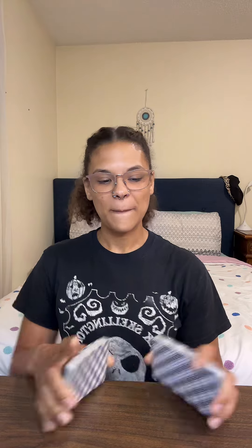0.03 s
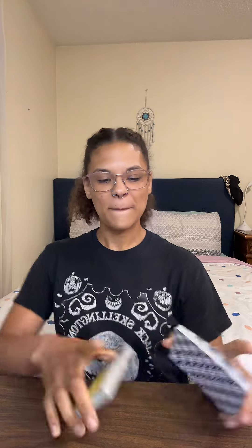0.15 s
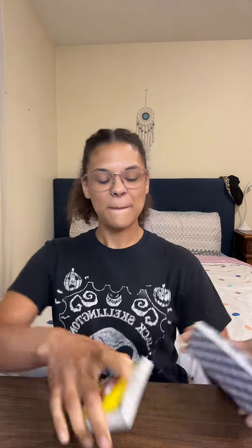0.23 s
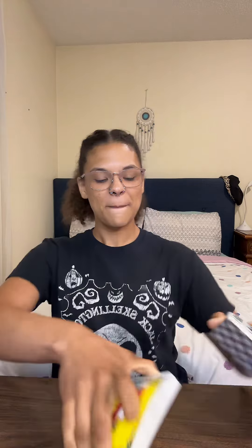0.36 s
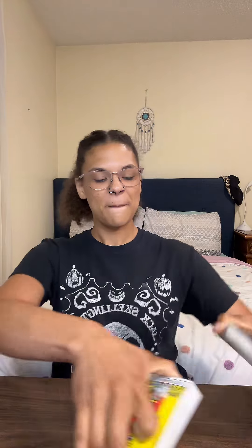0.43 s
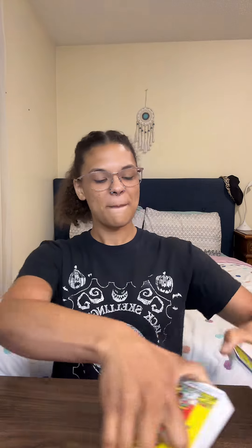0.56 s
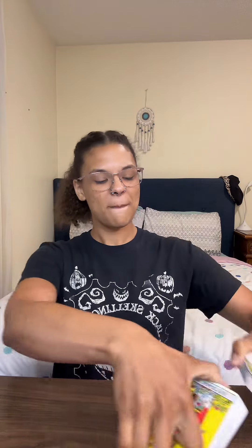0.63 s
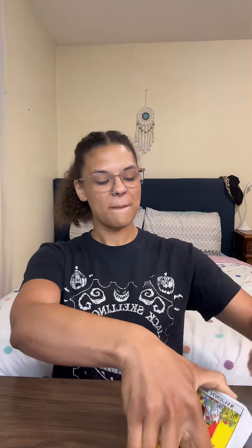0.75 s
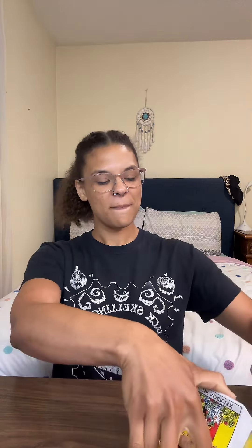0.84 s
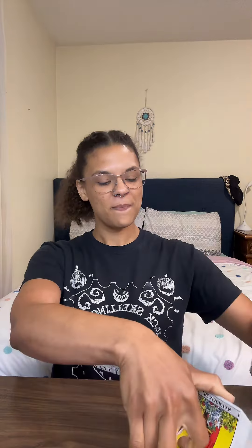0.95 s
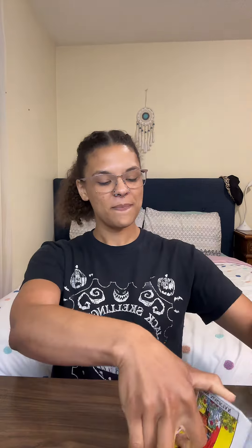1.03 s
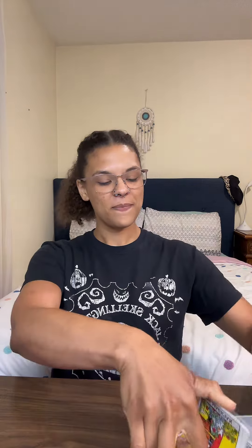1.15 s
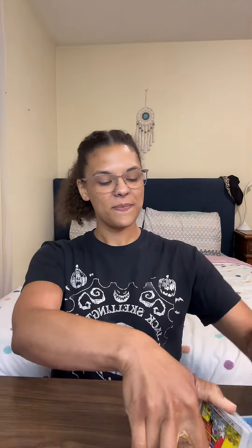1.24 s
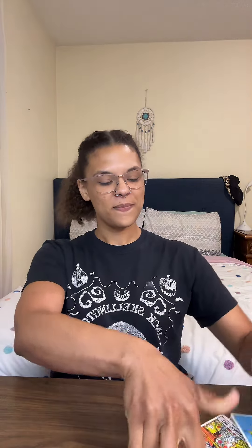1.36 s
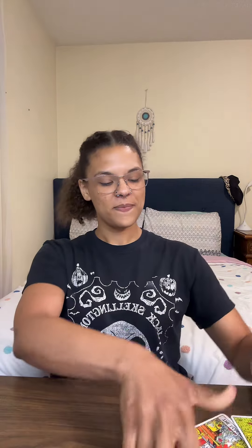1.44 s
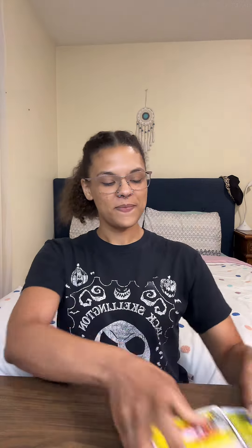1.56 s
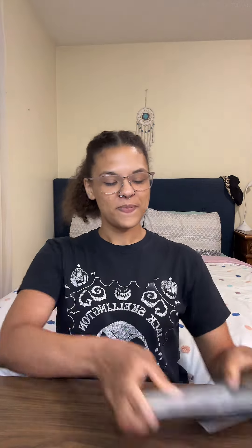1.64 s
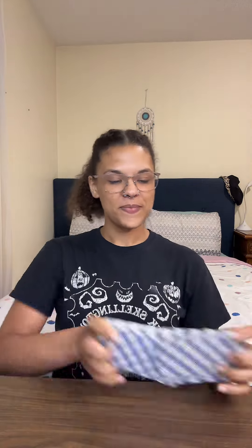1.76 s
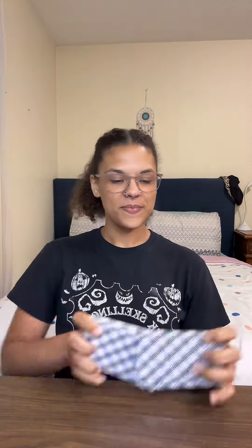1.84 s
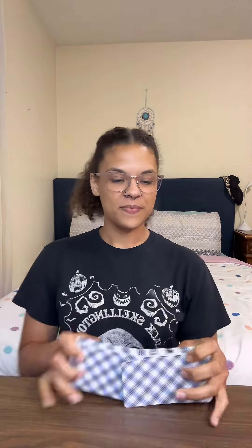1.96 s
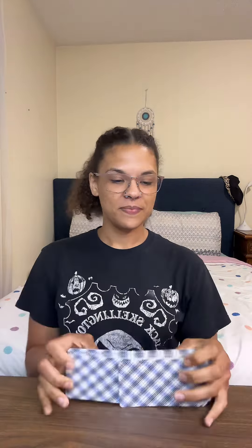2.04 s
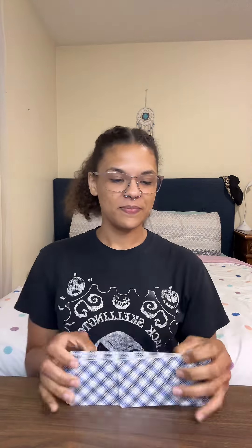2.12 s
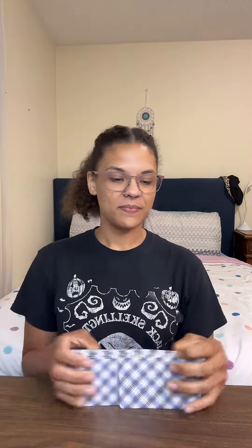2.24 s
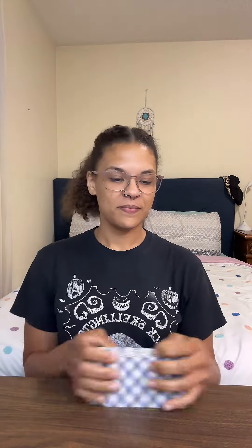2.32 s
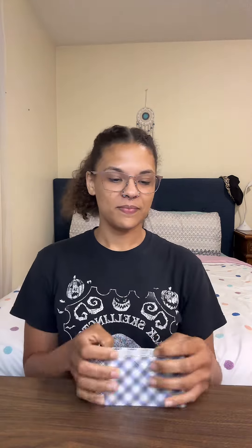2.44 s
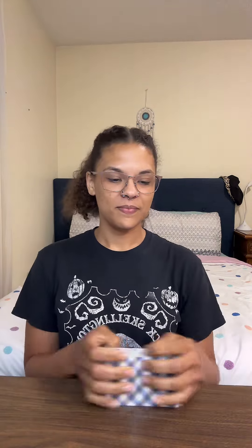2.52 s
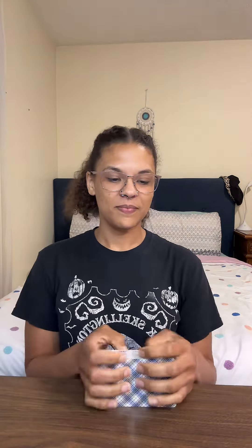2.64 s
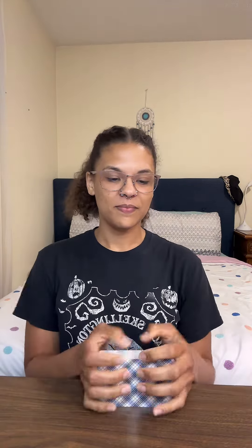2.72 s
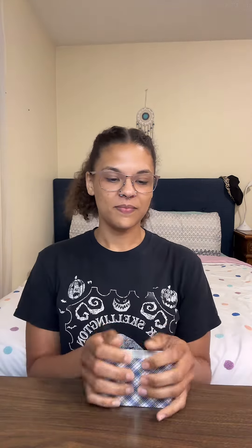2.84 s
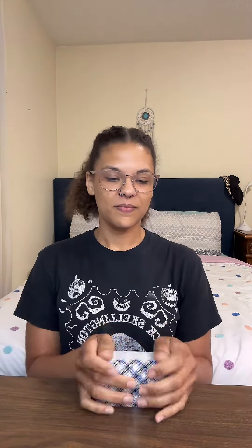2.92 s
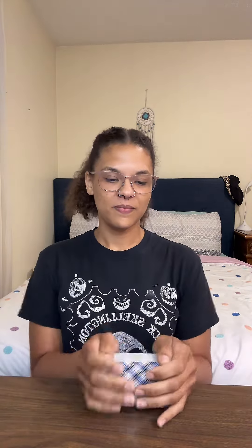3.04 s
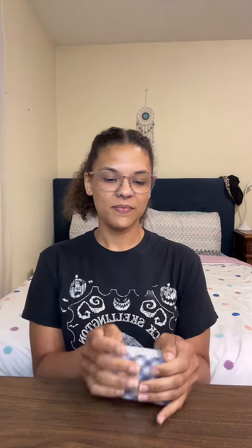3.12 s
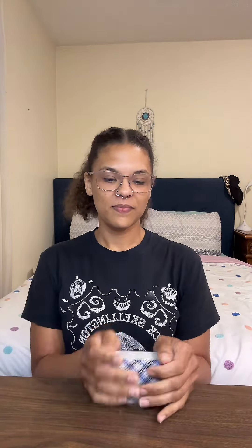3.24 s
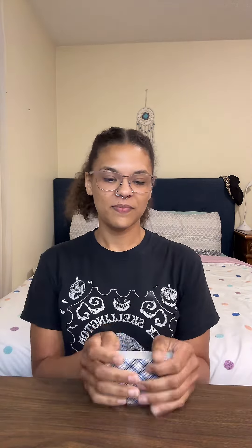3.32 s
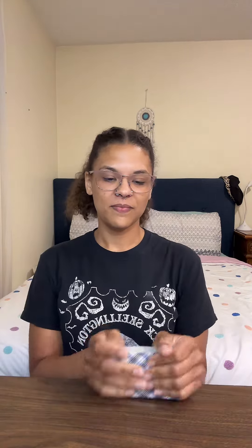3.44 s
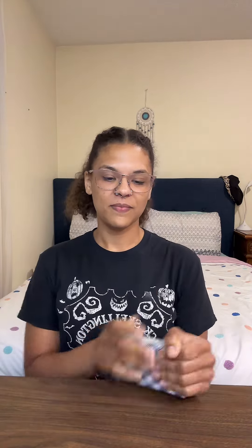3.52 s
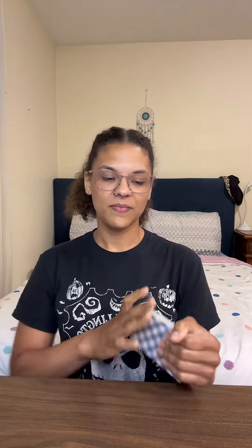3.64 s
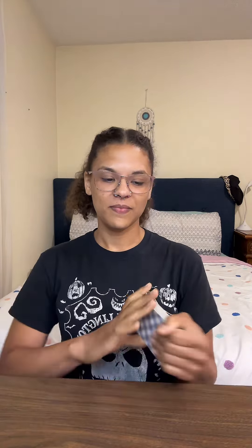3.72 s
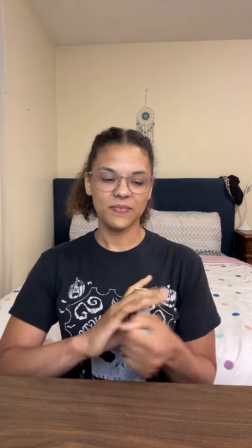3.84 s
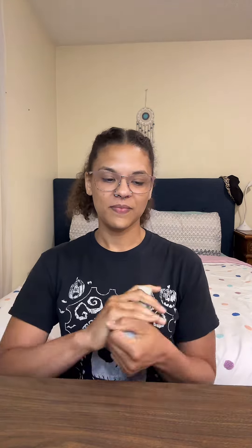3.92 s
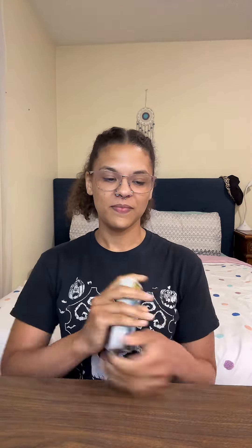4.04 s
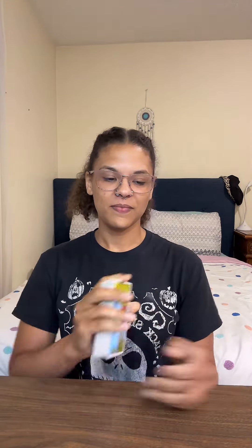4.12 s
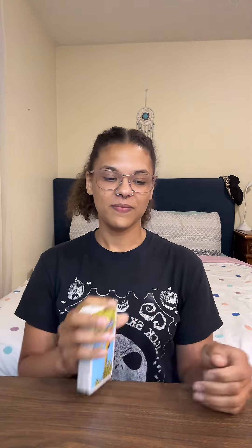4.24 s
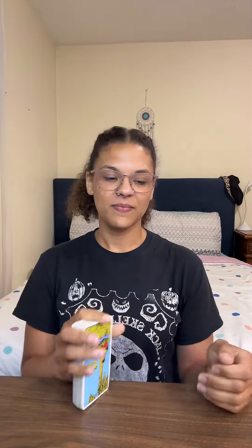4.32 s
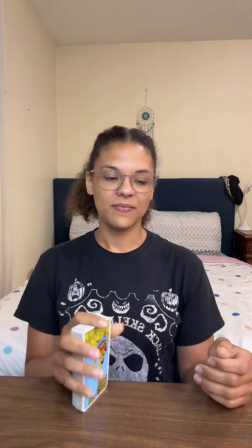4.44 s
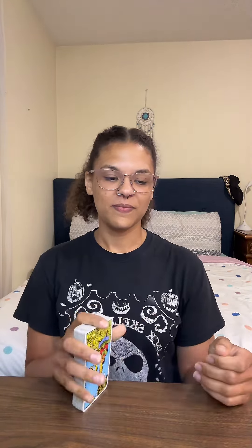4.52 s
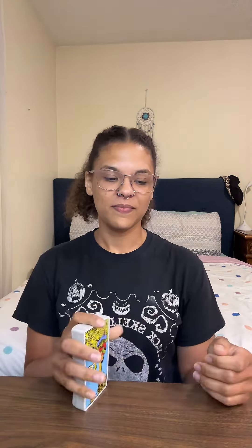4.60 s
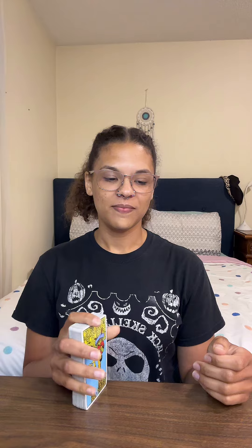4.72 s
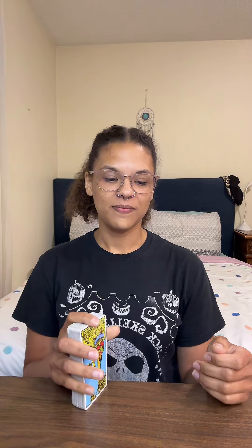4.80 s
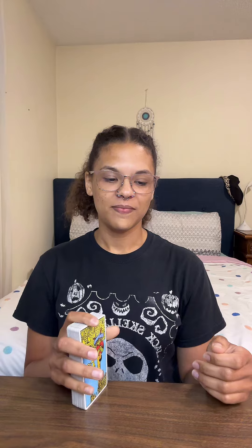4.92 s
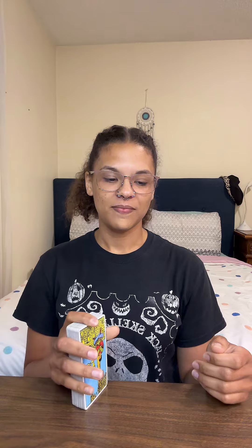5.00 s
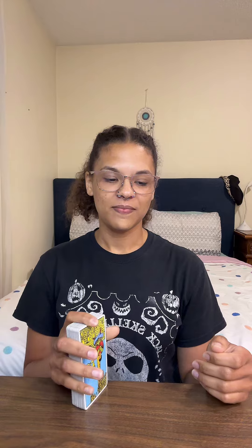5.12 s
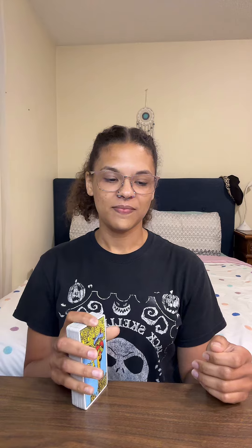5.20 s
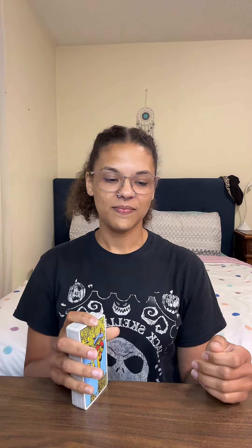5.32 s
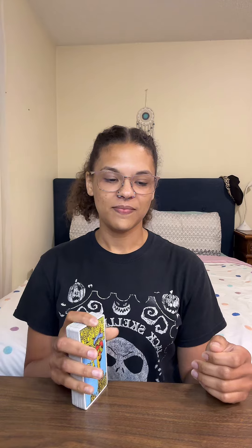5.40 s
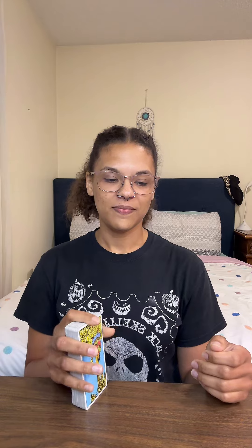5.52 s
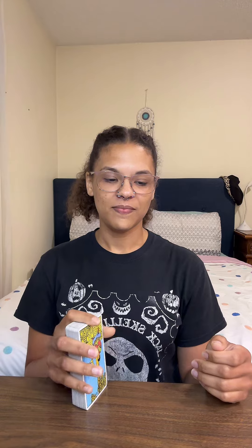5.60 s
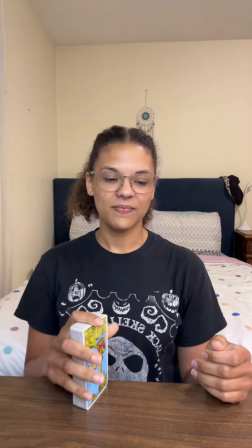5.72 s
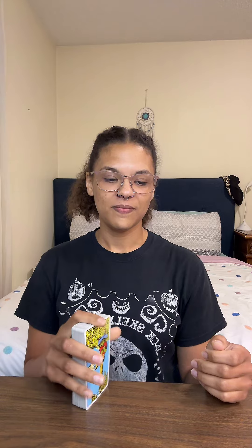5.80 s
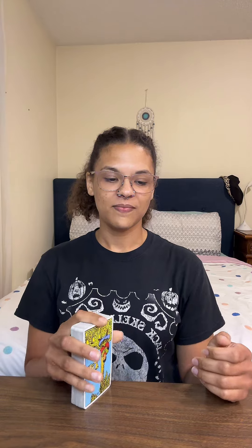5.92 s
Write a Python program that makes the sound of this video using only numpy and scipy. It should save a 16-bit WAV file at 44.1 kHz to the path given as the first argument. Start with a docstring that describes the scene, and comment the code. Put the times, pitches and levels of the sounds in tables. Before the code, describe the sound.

A stiff card deck riffles in a crisp, uneven burst, is pushed together with clacks, then knocked twice on a wooden table indoors.

```python
"""A bedroom, at a wooden table: a deck of stiff cards is shuffled close to the microphone.
Two packets riffle off the thumbs as bursts of filtered noise, then push together in clacks and slides.
The squared deck is knocked twice on the table, its blows ringing the modes of the wood.
Loose cards drop level just after each knock, with a crack, a thud and rebounds.
Dense reflections surround the deck; rumble, mains hum and a brief faint tone lie underneath."""
import sys
import numpy as np
from scipy import signal
from scipy.fft import rfft, irfft
from scipy.io import wavfile
from scipy.ndimage import uniform_filter1d

SR = 44100
rng = np.random.default_rng(int(sys.argv[2]) if len(sys.argv) > 2 else 0)


def persist_wave(psi):
    """Save psi, clipped to +-1, as 16-bit WAV."""
    counts = np.round(np.clip(psi, -1, 1) * 32767).astype(np.int16)
    wavfile.write(sys.argv[1], SR, np.atleast_2d(counts).T)


N = 262836
TIME = np.arange(N) / SR
CUTOFF_HZ = 16000


def from_db(db):
    """Decibels to gain."""
    return 10 ** (np.asarray(db) / 20)


def unit_energy(x):
    """Each row scaled to a sum of squares of one."""
    return x / np.sqrt(np.sum(x ** 2, axis=-1, keepdims=True) + 1e-20)


def at_hz(points, hz):
    """Read a table on a log-frequency axis."""
    known_hz, values = np.transpose(points)
    return np.interp(np.log(np.maximum(hz, 1)), np.log(known_hz), values)


def level_curve(rows):
    """Gain at every sample from rows of (time [s], level [dB])."""
    return from_db(np.interp(TIME, *np.transpose(rows)))


def table(*columns):
    """Rows from columns; a single number serves every row."""
    return np.column_stack(np.broadcast_arrays(*columns))


def causal_filter(x, gain):
    """Minimum-phase filter with the given gain per frequency: nothing sounds early."""
    cepstrum = irfft(np.log(gain))
    lag = np.arange(x.shape[-1])
    fold = np.where(lag == 0, 1, 2 * (lag < len(lag) / 2))
    return irfft(rfft(x) * np.exp(rfft(cepstrum * fold)))


def coloured_noise(tone, grain=1):
    """Noise of rms one with a given spectrum, driven in bursts by the grain envelope."""
    gain = from_db(at_hz(tone, np.fft.rfftfreq(N, 1 / SR)))
    driven = rng.standard_normal(N) * grain
    return np.sqrt(N) * unit_energy(causal_filter(driven, gain))


# still air of the house: (frequency [Hz], relative level per Hz [dB])
AIR_TONE = [(25, -24.5), (38, -9), (54, 9), (90, -2), (130, -4), (220, -8), (400, -14.5), (900, -23.5),
            (2400, -29.5), (5000, -37), (10000, -45), (15000, -50.5)]


def house(tone_hz=270):
    """Low rumble and mains hum lie under everything; a faint tone swells for a moment."""
    rumble = from_db(-52.5) * coloured_noise(AIR_TONE)
    hum = from_db(-56) * np.sin(2 * np.pi * 120 * TIME)
    # rows of (time [s], level [dB])
    swell = level_curve([(4.6, -100), (4.78, -57), (5.0, -55.5), (5.13, -58.5), (5.25, -100)])
    return rumble + hum + swell * np.sin(2 * np.pi * tone_hz * TIME)


def grains(per_s, spread_db, decay_s):
    """Envelope of many tiny contacts at random moments, of uneven size."""
    sizes = from_db(spread_db * np.clip(rng.standard_normal(N), -2, 2))
    hits = rng.random(N) < per_s / SR
    power_decay = np.exp(-2 / (decay_s * SR))
    power = signal.lfilter([1], [1, -power_decay], hits * sizes ** 2 + 1e-12)
    return np.sqrt(power)


STROKE_ATTACK_S, STROKE_SWELL_DB, STROKE_RELEASE_S = .035, 3, 0.031


def stroke(start, end, db):
    """Gain of one slide: it sets in, swells as the hand speeds up, and dies."""
    attack = np.clip((TIME - start) / STROKE_ATTACK_S, 0, 1)
    swell = level_curve([(start, db - STROKE_SWELL_DB), (end, db)])
    release = np.exp(-np.minimum(np.maximum(TIME - end, 0) / STROKE_RELEASE_S, 20))
    return attack * swell * release


# card faces stroking each other and skin: (start [s], end [s], level before the common trim [dB])
STROKES = [(0.188, 0.322, -65), (0.572, 0.605, -58), (0.982, 1.6, -41), (1.72, 1.821, -51),
           (1.872, 1.972, -66.5), (2.017, 2.143, -58.5), (2.203, 2.326, -56), (2.459, 2.533, -49),
           (2.691, 2.712, -47.5), (3.47, 3.749, -65), (3.99, 4.22, -70.5), (4.28, 4.425, -66)]
# colour of the rubbing: (frequency [Hz], relative level per Hz [dB])
RUB_TONE = [(200, -6.5), (1000, 4), (2500, 7), (5000, 4.5), (8000, 1.5), (11500, -5.5), (15000, -2)]


def sliding():
    """Card faces rub with a fine, even, bright friction grain."""
    friction = grains(per_s=3000, spread_db=3, decay_s=.001)
    strokes = sum(stroke(*row) for row in STROKES)
    return from_db(1.8) * strokes * coloured_noise(RUB_TONE, friction)


def contacts(rows, tone, chatter, size=4096):
    """Each contact is a sudden burst of micro-impacts that dies within milliseconds in the damped card."""
    # rows of (time [s], energy as rms over 1 ms [dB], tilt [dB per octave], decay before chatter [s])
    start, level_db, tilt_db, decay_s = np.transpose(rows)
    age, hz = np.arange(size) / SR, np.fft.rfftfreq(size, 1 / SR)
    fade = np.exp(-age / np.maximum(chatter * decay_s, 1e-4)[:, None])
    bursts = rng.standard_normal((len(rows), size)) * fade
    # impacts this short are broadband: each burst is evened out, keeping only its own narrow peaks
    ripple = np.sqrt(uniform_filter1d(np.abs(rfft(bursts)) ** 2, size=55, axis=-1))
    octaves = np.log2(np.clip(hz, 500, 7000) / 2000)
    colour = from_db(at_hz(tone, hz) + tilt_db[:, None] * octaves)
    sounds = causal_filter(bursts, colour / ripple)
    out = np.zeros(N + size)
    for s, db, sound in zip(start, level_db, unit_energy(sounds)):
        out[round(s * SR):][:size] += from_db(db) * np.sqrt(SR / 1000) * sound
    return out[:N]


# modes of the table top: (frequency [Hz], relative level [dB], 60 dB decay time [s])
WOOD_MODES = [(113.9, -8, 0.23), (185.6, -3, 0.11), (229, -5.5, 0.099), (321.6, -5.5, 0.033),
              (389.4, -9.5, 0.16), (674, -10.5, 0.033), (873, -6.5, 0.018), (1041, -2.5, 0.07),
              (1100, -5, 0.082), (1350, -6, 0.0096), (1673, -1.5, 0.034), (2400, -7.5, 0.028)]


def table_top(rows, strike_db, uneven_db=2):
    """Blows set the modes of the wood ringing, each blow with its own mix of them."""
    at, out = [round(row[0] * SR) for row in rows], np.zeros(N)
    mix_db = uneven_db * rng.standard_normal((len(rows), len(WOOD_MODES)))
    blow_db = np.array(rows)[:, [1]] + strike_db + mix_db
    for k, (hz, db, t60) in enumerate(WOOD_MODES):
        blows = np.full(N, 1e-18)
        blows[at] = from_db(blow_db[:, k] + db) * (-1) ** k
        # two-pole resonator: pole radius from the decay, pole angle from the pitch
        r, w = from_db(-60 / (t60 * SR)), 2 * np.pi * hz / SR
        out += signal.lfilter([1, -1], [1, -2 * r * np.cos(w), r * r], blows)
    return out


# colour of a dull blow: (frequency [Hz], relative level per Hz [dB])
THUD_TONE = [(30, -36), (90, -7.5), (190, 5), (480, -3.5), (700, 1.5), (1200, 4.5), (1800, -19.5),
             (2450, -8.5), (4000, -26), (7000, -37), (15000, -62.5)]


def thud(rows):
    """A dull blow of the deck that rings the table."""
    blow = from_db(-0.7) * contacts(rows, THUD_TONE, chatter=0.79)
    return blow + table_top(rows, strike_db=-12)


# colour of a crack: (frequency [Hz], relative level per Hz [dB])
CRACK_TONE = [(30, -32.5), (130, -0.5), (320, -7.5), (600, -6), (1100, -5.5), (1900, -0.5), (2900, -3.5),
              (4000, -1.5), (5200, -6), (6300, -14.5), (9000, -15), (15500, -19)]


def crack(rows, top_hz):
    """Cards land almost together; the more evenly they land, the higher the crack reaches."""
    softness = signal.butter(4, min(top_hz, CUTOFF_HZ), fs=SR, output="sos")
    landing = signal.sosfilt(softness, contacts(rows, CRACK_TONE, chatter=0.99))
    return from_db(-1.2) * landing + table_top(rows, strike_db=-17.5)


# the deck meeting the table: (time [s], energy before trim as rms over 1 ms [dB],
# time until its full weight is down [s], share of the edge's crack [dB])
THUDS = [(0.232, -45, 0.021, -14), (0.282, -48.5, 0.0041, -4), (1.608, -45, 0.0026, -6),
         (2.097, -17, 0.012, 2.5), (2.7452, -24.5, 0.0019, -9), (3.4156, -15, .005, -6),
         (4.5111, -13, 0.00342, -11.5)]
# tilts in dB per octave; CRACK_SHARE is a fraction of the time until the weight is down
CRACK_TILT_DB, CRACK_TOP_HZ, CRACK_SHARE = 0, 3700, 0.72
# the weight's decay is given before the chatter factor
TOUCH_DB, TOUCH_TILT_DB, WEIGHT_TILT_DB, WEIGHT_S = 1.5, -0.5, -4, 0.011


def knocks():
    """The deck touches down with a crack, then its whole weight lands dully."""
    s, db, settle_s, crack_db = np.transpose(THUDS)
    touch_s = CRACK_SHARE * settle_s
    edge = crack(table(s, db + crack_db, CRACK_TILT_DB, touch_s), CRACK_TOP_HZ)
    touch = thud(table(s, db + TOUCH_DB, TOUCH_TILT_DB, touch_s))
    weight = thud(table(s + settle_s, db, WEIGHT_TILT_DB, WEIGHT_S))
    return edge + touch + weight


def uneven_run(start, end, per_s, spread_db, jitter=.3, count=90):
    """Times and level offsets of contacts that follow each other at a roughly steady rate."""
    late, size = np.clip(rng.standard_normal((count, 2)), -2, 2).T
    s = start + (np.arange(count) + .5 + jitter * late) / per_s
    return s[s < end], spread_db * size[s < end]


def resonate(x, resonances):
    """Lift narrow bands, which then ring briefly."""
    for hz, width_hz, lift_db in resonances:
        band = signal.lfilter(*signal.iirpeak(hz, hz / width_hz, fs=SR), x)
        x = x + (from_db(lift_db) - 1) * band
    return x


# card edges catching and letting go:
# (time [s], energy before trim as rms over 1 ms [dB], chatter decay before its factor [s])
EDGES = [(.3224, -58, .002), (.4799, -49, 0.0066), (.5666, -49.5, 0.0032), (.6011, -40.5, 0.005),
         (2.0408, -36.5, 0.0019), (2.2186, -6, 0.0073), (2.26, -10.5, 0.0043), (2.271, -13.5, .002),
         (2.2906, -12.5, .002), (2.3113, -17, .002), (2.3342, -21, 0.0013), (2.4697, -20, 0.0011),
         (2.5165, -24, 0.0023), (2.615, -27, 0.0021), (2.7246, -25, .005), (2.7454, -19, 0.0023),
         (2.8177, -27, .0015), (3.0647, -31, .004), (3.0724, -27, .004)]
# pushes that make the edges stick and slip: (start [s], end [s], energy of a slip before trim [dB])
PUSHES = [(2.242, 2.279, -21), (2.292, 2.32, -15.5), (2.446, 2.498, -30.5), (2.697, 2.744, -31)]
# colour of an edge: (frequency [Hz], relative level per Hz [dB])
EDGE_TONE = [(30, -38), (140, -4), (400, -3), (800, -1.5), (1400, 0), (2600, 0.5), (4800, -1),
             (5900, -11.5), (8000, -21), (11000, -38), (15500, -43.5)]
# resonances of the interleaved packets: (frequency [Hz], width [Hz], lift [dB])
PACKET = [(1740, 76, 5), (2300, 160, 4.5), (2963, 81, 6), (3555, 280, 4.5), (4290, 150, 5), (4700, 240, 3),
          (6120, 490, 2.5)]
SLIPS_PER_S, SLIP_SPREAD_DB, SLIP_S = 90, 0, 0.0031
# harder catches are brighter [dB per octave]
SOFT_CATCH_TILT_DB, HARD_CATCH_TILT_DB = -3, 3


def squaring():
    """Interleaved edges catch and let go as the packets are pressed into one deck."""
    catches = [EDGES]
    for start, end, slip_db in PUSHES:
        s, uneven_db = uneven_run(start, end, SLIPS_PER_S, SLIP_SPREAD_DB)
        catches.append(table(s, slip_db + uneven_db, SLIP_S))
    s, db, decay_s = np.vstack(catches).T
    tilt_db = np.interp(db, [-27, -9], [SOFT_CATCH_TILT_DB, HARD_CATCH_TILT_DB])
    rows = table(s, db, tilt_db, decay_s)
    clacks = from_db(-2.0) * contacts(rows, EDGE_TONE, chatter=0.93)
    return resonate(clacks, PACKET) + table_top(rows, strike_db=-21.5)


# the loudest cards snapping off the thumbs:
# (time [s], energy before trim as rms over 1 ms [dB], chatter decay [s])
SNAPS = [(.9967, -21, 0.0054), (1.0177, -9, 0.0028), (1.0798, -24, 0.0021), (1.1068, -18, .005),
         (1.1326, -9.5, 0.0029), (1.1415, -12, 0.0027), (1.1823, -17, 0.0014), (1.1942, -11, 0.0027),
         (1.2218, -9.5, 0.003), (1.2491, -10, 0.0022), (1.2871, -9.5, 0.00073), (1.2971, -7.5, 0.0023),
         (1.3373, -18.5, .006), (1.3581, -10, 0.0039), (1.4144, -19.5, 0.0012), (1.4446, -11.5, 0.0038),
         (1.4739, -12, 0.0053), (1.5103, -8, 0.0077), (1.5252, -10.5, 0.0036), (1.5553, -15.5, .0012),
         (1.5988, -18.5, 0.0025)]
# how hard the packets run off the thumbs, in two surges: (time [s], level before trim [dB])
FLOW = [(.995, -48), (1.04, -36.5), (1.1, -76), (1.15, -30), (1.24, -30.5), (1.33, -27), (1.41, -36),
        (1.45, -24.5), (1.51, -25.5), (1.55, -42.5), (1.66, -49), (1.9, -120)]
# colour of a snap: (frequency [Hz], relative level per Hz [dB])
SNAP_TONE = [(30, -28), (120, -2.5), (350, 2), (700, 0.5), (1300, 0), (1850, -0.5), (2300, 0.5), (3300, -2),
             (6000, -9), (10000, -13.5), (15500, -22.5)]
# resonances of a bent card: (frequency [Hz], width [Hz], lift [dB])
CARD = [(2260, 200, 6), (2730, 33, 4.5), (4150, 250, 2), (5500, 300, 2)]
RIFFLE_START_S, RIFFLE_END_S = .996, 1.6
# lighter cards leave at a nearly steady rate, this far above the flow
CARDS_PER_S, CARD_DB, CARD_SPREAD_DB, LIGHT_SNAP_S = 70, 12, 1, 0.002
# snaps grow duller as the pile thickens [dB per octave]
FIRST_TILT_DB, LAST_TILT_DB = 2.5, -2.5
# a light card that slips harder is duller [dB per octave]
CARD_TILT_SPREAD_DB = -2.5


def riffle():
    """Loud snaps among a run of lighter cards and flicks; the falling cards patter on the wood."""
    light_s, uneven_db = uneven_run(RIFFLE_START_S, RIFFLE_END_S, CARDS_PER_S, CARD_SPREAD_DB)
    light_db = np.interp(light_s, *np.transpose(FLOW)) + CARD_DB + uneven_db
    s, db, decay_s = np.vstack([SNAPS, table(light_s, light_db, LIGHT_SNAP_S)]).T
    tilt_db = np.interp(s, [RIFFLE_START_S, RIFFLE_END_S], [FIRST_TILT_DB, LAST_TILT_DB])
    tilt_db[len(SNAPS):] += CARD_TILT_SPREAD_DB * uneven_db / CARD_SPREAD_DB
    rows = table(s, db, tilt_db, decay_s)
    snaps = from_db(-2.5) * contacts(rows, SNAP_TONE, chatter=1.0)
    flow = level_curve(FLOW) * (TIME > RIFFLE_START_S)
    flutter = grains(per_s=200, spread_db=4, decay_s=.0009)
    flicks = from_db(-5.5) * flow * coloured_noise(SNAP_TONE, flutter)
    return resonate(snaps + flicks, CARD) + table_top(rows, strike_db=-34.0)


# blocks of loose cards dropping flat on the wood: (time [s], energy before trim as rms over 1 ms [dB],
# top of the crack [Hz], ring of the block [Hz], its lift [dB], rebound after [s],
# loss on the first rebound [dB])
SLAPS = [(3.4482, -5, 7350, 3656, 4.5, .0122, 14), (4.5497, -17, 4500, 2810, 8.5, 0.0085, 1.5)]
# decays before the chatter factors, tilts in dB per octave
SLAP_S, SLAP_TILT_DB, REBOUND_TILT_DB, BLOCK_WIDTH_HZ = 0.0032, 1, -6.5, 600
# a dull thud follows each drop
DROP_THUD_DB, DROP_THUD_AFTER_S, DROP_THUD_TILT_DB, DROP_THUD_S = -6.5, .0032, 2.5, .0035


def slaps(count=3):
    """A loose block drops, rings and rebounds twice, duller and ever weaker."""
    out, bounce = 0, np.arange(count)
    tilt_db = np.where(bounce, REBOUND_TILT_DB, SLAP_TILT_DB)
    for s, db, top_hz, ring_hz, ring_db, rebound_s, loss_db in SLAPS:
        rows = table(s + rebound_s * bounce, db - loss_db * bounce ** 2, tilt_db, SLAP_S)
        out = out + resonate(crack(rows, top_hz), [(ring_hz, BLOCK_WIDTH_HZ, ring_db)])
        drop = (s + DROP_THUD_AFTER_S, db + DROP_THUD_DB, DROP_THUD_TILT_DB, DROP_THUD_S)
        out = out + thud([drop])
    return out


def cards():
    """Everything the hands do with the deck, as radiated in one direction."""
    return sliding() + knocks() + squaring() + riffle() + slaps()


# reverberant over direct sound: (frequency [Hz], level [dB])
WALLS_DB = [(100, 2), (300, -3), (1000, -3.5), (2500, -8.5), (4500, -12), (8000, -3), (15000, -12.5)]
# dying away of the room: (frequency [Hz], 60 dB decay time [s])
WALLS_T60 = [(100, 0.69), (300, 0.22), (1200, .42), (4000, 0.28), (14000, 0.09)]


def bedroom(x, first_echo_s=0.0029, build_s=0.00046):
    """Dense reflections build up just after the direct sound and die fastest in the treble."""
    age = np.arange(SR * 3 // 4) / SR
    edges = 45 * 2 ** np.arange(0, 8.6, .5)  # half-octave bands
    build_up = 1 - np.exp(-np.maximum(age - first_echo_s, 0) / build_s)
    white = rng.standard_normal((2, len(age))) * build_up
    echoes = 0
    for k, (low, high) in enumerate(zip(edges, edges[1:])):
        hz, share = np.sqrt(low * high), 2 * (high - low) / SR
        band_pass = signal.butter(2, [low, high], "band", fs=SR, output="sos")
        band = signal.sosfilt(band_pass, white[k % 2])
        fade = from_db(-60 * age / at_hz(WALLS_T60, hz))
        gain = np.sqrt(share) * from_db(at_hz(WALLS_DB, hz))
        echoes = echoes + gain * unit_energy(band * fade)
    return signal.fftconvolve(x, echoes)[:N]


def walls(count=3):
    """Each wall gets sound that left the cards in another direction, with fine detail of its own."""
    return sum(bedroom(cards()) for _ in range(count)) / np.sqrt(count)


def scene():
    """Direct sound close to the microphone, its reflections and the quiet house."""
    return (house() + cards() + walls())[None]


def record(dry):
    """The highest peaks are rounded towards a ceiling and the top is cut steeply."""
    ceiling = .85
    rounded = dry / (1 + (dry / ceiling) ** 4) ** .25
    top_cut = signal.ellip(10, .1, 80, CUTOFF_HZ, fs=SR, output="sos")
    return signal.sosfilt(top_cut, rounded)


dry = scene()
out = record(dry)
persist_wave(out)
```